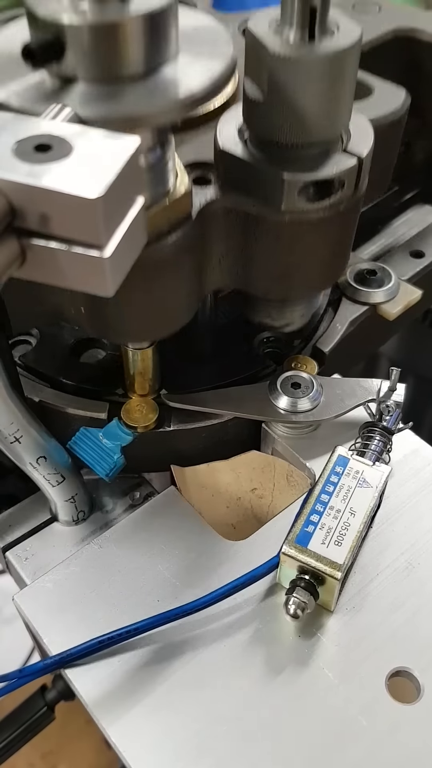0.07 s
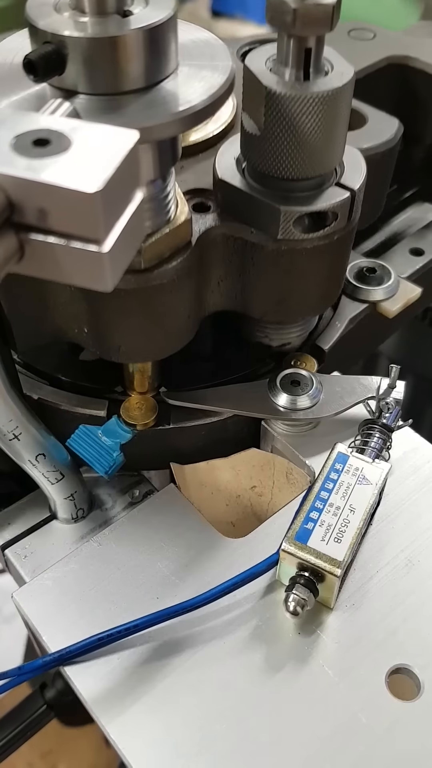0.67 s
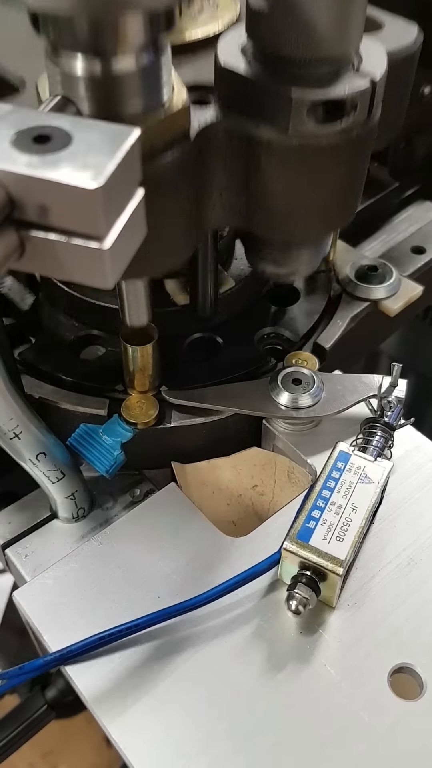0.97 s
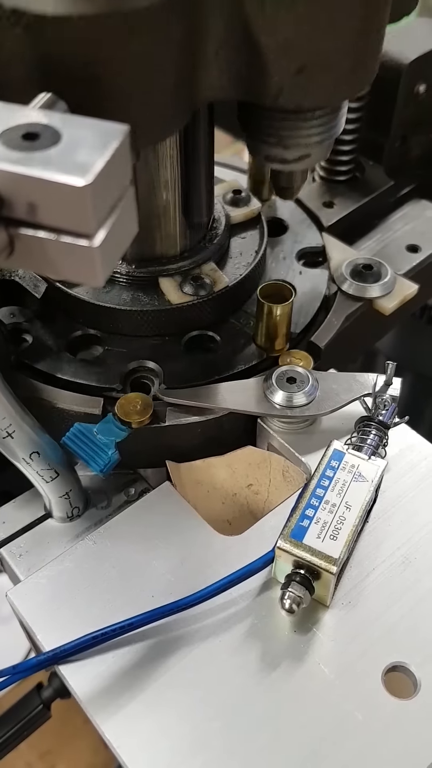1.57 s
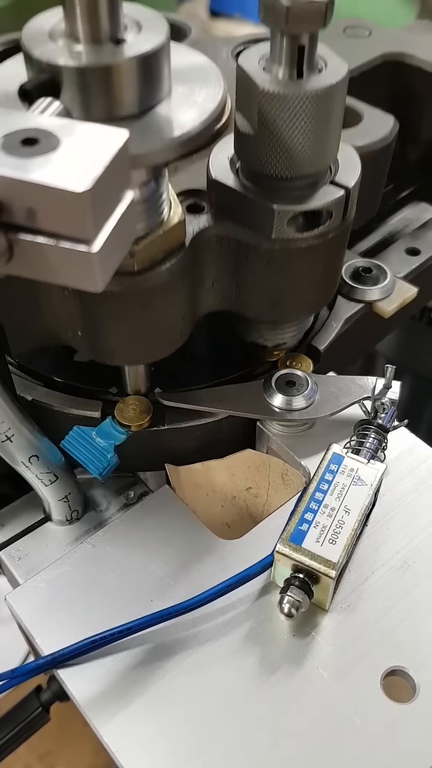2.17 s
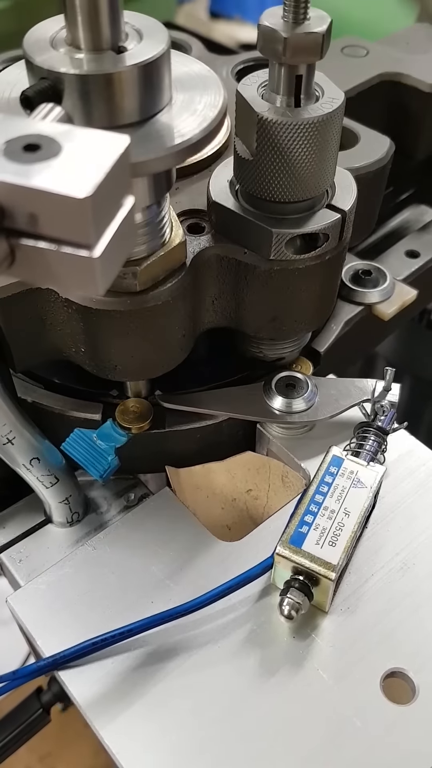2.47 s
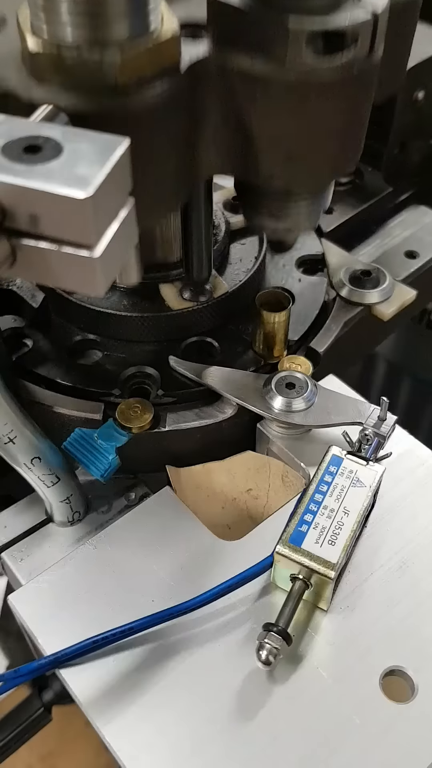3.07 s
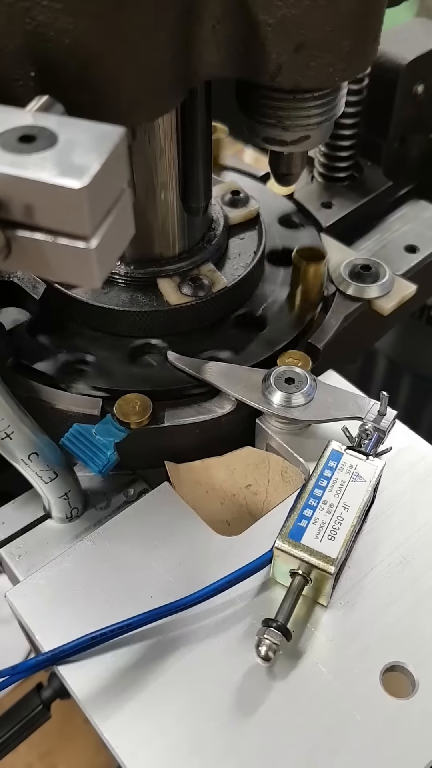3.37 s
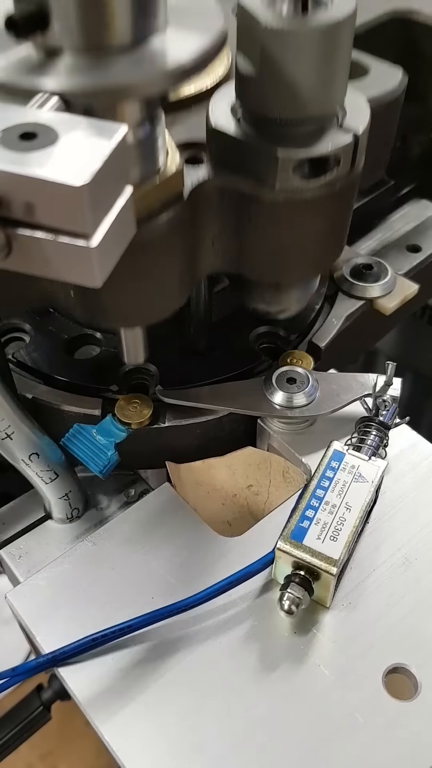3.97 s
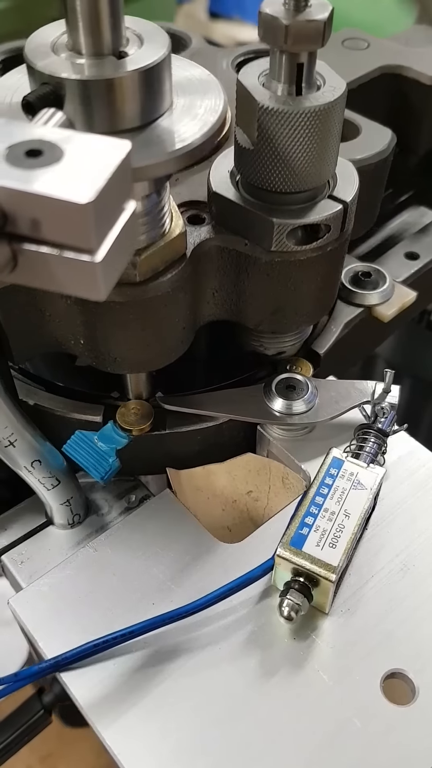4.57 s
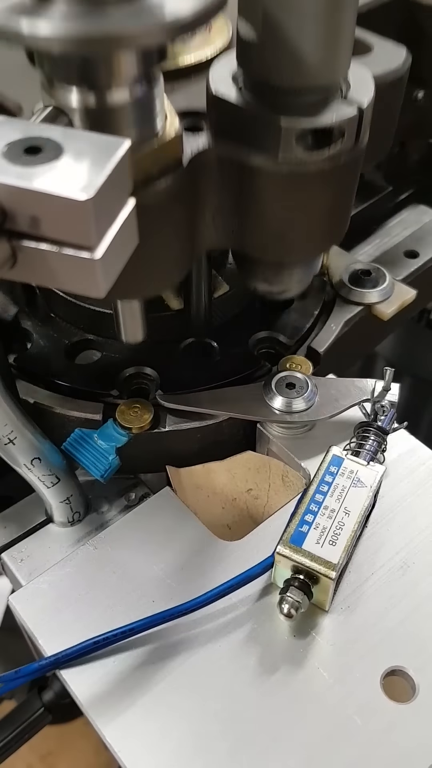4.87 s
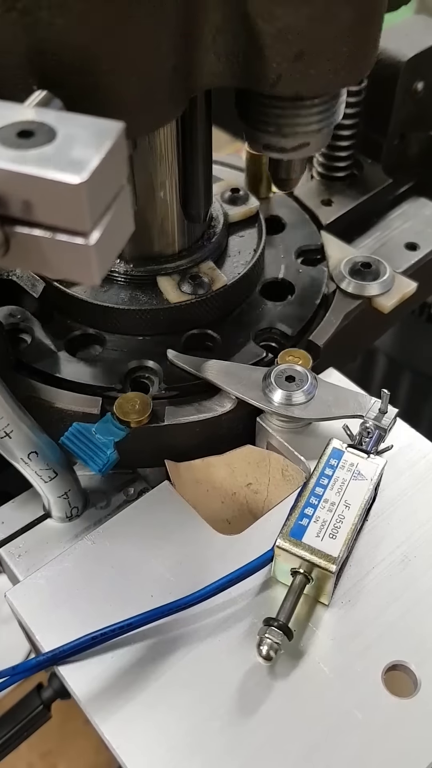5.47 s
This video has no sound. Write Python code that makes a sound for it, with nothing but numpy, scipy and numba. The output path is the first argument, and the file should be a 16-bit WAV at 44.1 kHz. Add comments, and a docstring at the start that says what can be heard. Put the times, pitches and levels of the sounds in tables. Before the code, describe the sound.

A motorised press runs in a workshop, close to a hand-held phone, with a steady motor hum, gear noise and a thin high whine. It opens with a few dull knocks and a brief metallic jingle. About every two seconds a stroke brings sharp clicks, ticks and the bright clink of brass cases. In the second half a steel lever snaps loudly twice, and everything briefly dips in level after each snap.

```python
"""Motorised reloading press

A press cycles about every two seconds, close to a hand-held phone in a workshop. Its motor hums and
its drive whines. Impacts excite damped modes: dull knocks sound, a loose part jingles, and pins, pawls
and brass cases click and ring. Twice a solenoid snaps a steel lever, and each snap makes the phone's
gain control duck for about half a second."""
import sys
import numpy as np
from scipy import signal
from scipy.fft import rfft, irfft
from scipy.io import wavfile
from scipy.ndimage import uniform_filter1d
from numba import njit

SR = 44100
rng = np.random.default_rng(int(sys.argv[2]) if len(sys.argv) > 2 else 0)


def dump(signal):
    """Clip the signal to [-1, 1] and save it as 16-bit WAV at the path in sys.argv[1]."""
    limited = np.clip(np.atleast_2d(signal).T, -1, 1)
    pcm = np.round(limited * 32767).astype(np.int16)
    wavfile.write(sys.argv[1], SR, pcm)


N = 252252
T = np.arange(N) / SR
AGE = T[:SR // 2]  # time since an impact, t/s
FREQ = np.arange(N // 2 + 1) * SR / N


def undb(db):
    """Amplitude ratio of a level in decibels."""
    return 10 ** (np.asarray(db) / 20)


def pan(db):
    """Level difference, left minus right, as gains at the two microphone ports."""
    return undb(np.array([[db], [-db]]) / 2)


def add(out, t, x):
    """Superposition: x joins out from time t."""
    i = min(int(t * SR), N)
    out[:, i:i + x.shape[1]] += x[:, :N - i]


def walk(rate_hz):
    """Smooth random fluctuation with a spread near 1."""
    k = int(SR / rate_hz)
    steps = np.repeat(rng.standard_normal(N // k + 1), k)
    return 1.3 * uniform_filter1d(uniform_filter1d(steps, k), k)[:N]


def rise(start_db, end_db, from_s, length_s):
    """Linear ramp between two steady levels."""
    return start_db + (end_db - start_db) * np.clip((T - from_s) / length_s, 0, 1)


def fade(t60):
    """Damping: exponential decay by 60 dB in t60 seconds."""
    return np.exp(-np.log(1000) * AGE / t60)


def noise(spectrum, size, lag_s, diffuse):
    """Partial coherence: direct noise reaches the right port late, amid a diffuse field; rms 1."""
    f = np.arange(size // 2 + 1) * SR / size
    hz, db = np.transpose(spectrum)
    colour = undb(np.interp(np.log(f + 1), np.log(hz), db))
    source, left, right = rfft(rng.standard_normal((3, size))) * colour
    direct = np.array([source, source * np.exp(-2j * np.pi * f * lag_s)])
    x = irfft(np.sqrt(1 - diffuse) * direct + np.sqrt(diffuse) * np.array([left, right]), size)
    return x / x.std()


def ring(hz, t60, rise_s, spread, count=4):
    """Mode splitting: close partners beat as they decay, each with its own phase at each port."""
    detune = spread * np.linspace(-1, 1, count) * rng.uniform(.5, 1, count)
    phase = rng.random((count, 2, 1))
    partners = sum(np.sin(2 * np.pi * (hz * (1 + d) * AGE + p)) for d, p in zip(detune, phase))
    return partners * np.sqrt(2 / count) * fade(t60) * (1 - np.exp(-AGE / rise_s))


def reflect(x, db, t60):
    """Reverberation: dense reflections from nearby metal and walls follow the direct sound."""
    tail = rng.standard_normal((2, len(AGE))) * fade(t60) * (AGE > .002)
    tail /= np.sqrt(np.sum(tail ** 2, axis=1, keepdims=True))
    return x + undb(db) * signal.fftconvolve(x, tail, axes=1)[:, :N]


# resonances of the press frame: f/Hz, width/Hz, lift at full depth/dB
FRAME_MODES = [(763, 9.6, 7.5), (1170, 150, 1), (1800, 244, 4.5), (2150, 186, -5), (2566, 550, 4.5),
               (4030, 690, 3.5), (5430, 80, 6), (6940, 360, 7.5)]


def frame(x, depth=1):
    """Resonance: the press frame colours a sound as a minimum-phase filter."""
    lift_db = sum(db / (1 + (2 * (FREQ - hz) / width) ** 2) for hz, width, db in FRAME_MODES)
    # folding the cepstrum makes the frame ring only after it is struck
    cepstrum = irfft(np.log(undb(depth * lift_db)), N)
    cepstrum[1:N // 2] *= 2
    cepstrum[N // 2 + 1:] = 0
    return irfft(rfft(x) * np.exp(rfft(cepstrum)), N)


# spectra of the gear noise and of the faint hiss above it: f/Hz, relative level/dB
GEAR_SPECTRUM = [(20, -37.5), (32, -17), (90, -5.5), (155, -4.5), (255, -1), (400, -5.5), (500, -8),
                 (660, -1), (850, -9), (1050, -15), (1500, -17.5), (2150, -15), (3000, -17.5),
                 (4000, -29.5), (5600, -32.5), (6200, -39), (7700, -45), (9000, -73)]
HISS_SPECTRUM = [(7000, -0.5), (8200, 5), (8800, -52), (9600, -22.5), (10700, -9), (12300, 2.5),
                 (13500, -4.5), (15500, -17), (16500, -33.5)]
# balance of the gear noise between the ports: f/Hz, left minus right level/dB
GEAR_BALANCE = [(70, 2), (200, -1.5), (380, 0.5), (650, -4), (1150, 4), (2300, -0.8), (7000, -21)]
# motor tones: f/Hz, level/dB
HUM_TONES = [(74, -51), (162, -49), (222.5, -53), (445.5, -45), (891, -47)]


def motor(gear_db=-33.5, hiss_db=-45, flutter_db=1, waver=.0027, lag_s=.000583, tone_lag_s=.00042):
    """Forced vibration: gear and fan noise passes through the frame, beside wavering motor tones."""
    balance_db = np.interp(FREQ, *np.transpose(GEAR_BALANCE)) * np.array([[.5], [-.5]])
    gears = irfft(rfft(noise(GEAR_SPECTRUM, N, lag_s, diffuse=.34)) * undb(balance_db), N)
    out = undb(gear_db + flutter_db * walk(13)) * frame(gears)
    shaft_time = T + np.cumsum(waver * walk(12)) / SR
    port_times = np.array([shaft_time, shaft_time - tone_lag_s])
    for hz, db in HUM_TONES:
        out += np.sqrt(2) * undb(db + 1.7 * walk(6.9)) * np.sin(2 * np.pi * hz * port_times)
    bass = signal.sosfiltfilt(signal.butter(2, 280, fs=SR, output="sos"), out)
    bass_gain = undb(rise(-18, -2.5, from_s=.55, length_s=.5))  # the bass starts low and comes up
    hiss = undb(hiss_db) * noise(HISS_SPECTRUM, N, lag_s, diffuse=1) * pan(7.3)
    return out + bass * (bass_gain - 1) + hiss


# switching tone and its sidebands: offset in multiples of the ripple, relative level/dB
WHINE_PARTIALS = [(-1, -62), (0, -43.5), (1, -51), (2, -53), (3, -53)]


def drive(switching_hz=7926.4, ripple_hz=150, waver_db=2.5):
    """Modulation: mains ripple gives the drive's whine sidebands; standing waves favour the right port."""
    port_phase = np.array([[0], [1.52]])
    tone = sum(undb(db) * np.cos(2 * np.pi * (switching_hz + round(k) * ripple_hz) * T + port_phase)
               for k, db in WHINE_PARTIALS)
    level_db = rise(-3.5, -1, from_s=0, length_s=.99) + waver_db * np.array([walk(5.95), walk(5.52)])
    return np.sqrt(2) * tone * undb(level_db) * pan(-11)


# dull knocks close to the phone: t/s, relative level/dB, f/Hz
KNOCK_HITS = [(.032, -18, 732), (.036, -28, 120), (.184, -8, 783), (0.238, -20, 1007), (.264, -13, 469),
              (.327, -24, 696), (.432, -17.5, 857), (.472, -16.5, 638), (.524, -26, 800), (2.626, -24, 332),
              (2.679, -21, 184), (2.730, -17.5, 177), (2.83, -20, 164), (2.839, -18.5, 433)]


def knocks(bounce_s=.018, bounce_db=-8, rise_s=.0014, soft_db=-18.5):
    """Damped resonance in a thud, with one bounce: lower knocks ring longer, harder ones are brighter."""
    out = np.zeros((2, N))
    for t, db, hz in KNOCK_HITS:
        envelope = fade(t60=.048 * (700 / hz) ** .6) * (1 - np.exp(-AGE / rise_s))
        tone = np.sqrt(2) * np.sin(2 * np.pi * hz * AGE)
        for delay, blow_db in [(0, db), (bounce_s, db + bounce_db)]:
            bright_db = max(blow_db - soft_db, 0)
            spectrum = [(hz / 5, -30), (hz / 2, -7), (hz, 0), (hz * 1.64, -3),
                        (hz * 3, -21 + bright_db), (hz * 10, -50 + bright_db)]
            thud = noise(spectrum, len(AGE), lag_s=0, diffuse=.17)
            add(out, t + delay, undb(blow_db - 3) * (thud + tone) * envelope * pan(-2.5))
    return signal.sosfilt(signal.butter(3, 120, "highpass", fs=SR, output="sos"), out)


# spectra of a metallic click, body and bright edge, as the phone's microphone colours them:
# f/Hz, relative level/dB
BODY_SPECTRUM = [(300, -3.5), (900, -7.5), (2400, 2.5), (3800, -0.5), (5200, 1), (6200, 5), (7400, 1),
                 (8200, 4.5), (9000, -21.5), (12000, -38)]
EDGE_SPECTRUM = [(8000, -23), (9300, -19.5), (10400, -2.5), (11300, 2), (12500, 8), (13500, 3), (15200, -9),
                 (16500, -32.5)]


def contact(body_db, edge_db, lag_s=.000408):
    """Impact noise: a brief, broadband metallic click, coloured by the microphone."""
    body = undb(body_db) * noise(BODY_SPECTRUM, len(AGE), lag_s, diffuse=.44) * fade(t60=.031)
    edge = undb(edge_db) * noise(EDGE_SPECTRUM, len(AGE), lag_s, diffuse=.39) * fade(t60=.021)
    return body * pan(.94) + edge * pan(6.3)


def chime(db, hz, t60, pan_db=8):
    """Free vibration of a small struck part."""
    return undb(db) * ring(hz, t60, rise_s=.00045, spread=.00744) * pan(pan_db)


def click(body_db, edge_db, rebound_s=.006, rebound_db=-4.5):
    """Inelastic collision: a contact and one weaker rebound."""
    out = contact(body_db, edge_db)
    late = int(rebound_s * rng.uniform(.7, 1.3) * SR) + 1
    out[:, late:] += contact(body_db + rebound_db, edge_db + rebound_db)[:, :-late]
    return out


# strokes of the press: t/s, pin level/dB, pin f/Hz, pawl level/dB
PRESS_STROKES = [(.146, -13.5, 12970, -13), (2.112, -11.5, 13000, -11.5), (4.084, -11.5, 12650, -12)]
# ticks of slides and links: t/s into the stroke, body level/dB, edge level/dB
LINK_TICKS = [(0.255, -34, -38), (1.233, -32.5, -31), (1.356, -30, -28.5), (1.631, -27.5, -25),
              (1.909, -37, -39)]


def strokes(clack_s=.1455, pawl_s=1.529):
    """Cyclic impacts: a pin rings, the ram bottoms out, links tick, the pawl drops into the shell plate."""
    out = np.zeros((2, N))
    for t, pin_db, pin_hz, pawl_db in PRESS_STROKES:
        pin = contact(pin_db - 11.5, pin_db) + chime(pin_db, pin_hz, t60=.065)
        ram_clack = contact(-26.5, -39) + chime(-27, hz=1848, t60=.039, pan_db=3)
        pawl = click(pawl_db - 4.5, pawl_db) + chime(pawl_db - 10, hz=15000, t60=.03)
        shaken_cases = chime(pawl_db - 15, hz=10930, t60=.17)
        add(out, t, pin)
        add(out, t + clack_s, ram_clack)
        add(out, t + pawl_s, pawl + shaken_cases)
        for delay, body_db, edge_db in LINK_TICKS:
            add(out, t + delay, click(body_db, edge_db))
    return out


# modes of a small loose metal part: f/Hz, relative level/dB, t60/s
JINGLE_MODES = [(10900, -11, .25), (11243, -8, .2), (11358, 0, .2), (12220, -14, .1)]


def jingle(start_s=.181, gap_s=.049, blow_db=-11, bounce_db=-19.5, loss_db=2, bounces=6):
    """Repeated excitation: a loose part is struck, then rings again at each weaker, uneven bounce."""
    out, t = np.zeros((2, N)), start_s
    for db in [blow_db] + [bounce_db - k * loss_db for k in range(bounces)]:
        modes = sum(undb(mode_db) * ring(hz, t60, rise_s=.00074, spread=0, count=1)
                    for hz, mode_db, t60 in JINGLE_MODES)
        add(out, t, undb(db) * modes)
        t += gap_s * (1 + .08 * rng.standard_normal())
    return out


# further dry clicks of the press: t/s, body level/dB, edge level/dB
PRESS_CLICKS = [(.183, -22, -34), (.312, -33.5, -29), (1.877, -23, -28), (2.914, -29, -36),
                (3.822, -20, -15), (4.881, -29, -36), (5.196, -32, -34)]


def press_clicks(ticks=14, tick_db=-38, scatter_db=.5):
    """Impact noise: dry clicks, several recurring from stroke to stroke, among faint random ticks."""
    out = np.zeros((2, N))
    for t, body_db, edge_db in PRESS_CLICKS:
        add(out, t, click(body_db, edge_db))
    for _ in range(ticks):
        db = tick_db + scatter_db * rng.standard_normal()
        add(out, rng.random() * N / SR, contact(db, db))
    return out


# clinks of brass cases: t/s, edge level/dB, f/Hz, t60/s
CASE_CLINKS = [(.932, -15, 11450, 0.05), (1.626, -18, 10800, 0.075), (1.887, -24, 10850, 0.07),
               (2.821, -13.5, 11430, 0.057), (3.606, -12, 10880, 0.1), (3.865, -26.5, 11060, 0.086),
               (4.767, -19.5, 11200, 0.049), (5.556, -20.5, 10850, .3), (5.659, -21, 11000, 0.21)]


def brass_cases():
    """Shell vibration: cases clink as they leave the die or rock in the plate."""
    out = np.zeros((2, N))
    for t, db, hz, t60 in CASE_CLINKS:
        add(out, t, contact(db - 9.5, db) + chime(db - 4.5, hz, t60))
    return out


# blows of the solenoid's lever on its stop: t/s, relative level/dB
SOLENOID_SNAPS = [(3.1105, 4), (5.1103, 4)]


def plunger(lead_s=.0148):
    """Contact noise: the plunger clicks as it starts to move, just ahead of each blow."""
    out = np.zeros((2, N))
    for t, _ in SOLENOID_SNAPS:
        add(out, t - lead_s, contact(body_db=-27, edge_db=-24))
    return out


# a blow and its bounces: t/s after the blow, relative level/dB
SNAP_BOUNCES = [(0, 2), (.0019, -1), (0.013, -17)]
# spectra of the blow and of the spring's rattle: f/Hz, relative level/dB
BLOW_SPECTRUM = [(35, -14), (110, 3), (220, 9.5), (500, 8), (950, 4.5), (1500, -4), (3000, 0.5),
                 (7500, -2.5), (9200, -17), (12000, 2.5), (14000, -8), (16500, -8)]
RATTLE_SPECTRUM = [(40, -16), (110, -11), (200, -13), (600, -33), (1200, -17), (3000, -1.5), (5200, 7),
                   (6200, 9.5), (7500, 8), (8900, -39), (10300, 7.5), (12200, 3), (14000, 3), (15500, -27)]
# modes of lever and plunger: f/Hz, relative level/dB, t60/s
LEVER_MODES = [(84, -34.5, 0.094), (169, -33, 0.16), (268, -33.5, 0.12), (960, -37, .025), (5110, -44, .08),
               (7500, -36, 0.35), (12070, -16.5, 0.14), (13700, -16, 0.036)]


def solenoid(blow_db=-9, rattle_db=-25, chatter_db=3):
    """Impulsive excitation: the lever hits its stop and bounces; lever and return spring chatter on."""
    out = np.zeros((2, N))
    for t, db in SOLENOID_SNAPS:
        for delay, bounce_db in SNAP_BOUNCES:
            blow = noise(BLOW_SPECTRUM, len(AGE), lag_s=.00025, diffuse=.71) * fade(t60=.0073)
            add(out, t + delay, undb(db + blow_db + bounce_db) * blow * pan(8.6))
        rattle = noise(RATTLE_SPECTRUM, len(AGE), lag_s=.0003, diffuse=1) * fade(t60=.24)
        lever = sum(undb(mode_db) * ring(hz, t60, rise_s=.0083, spread=.0081)
                    for hz, mode_db, t60 in LEVER_MODES)
        chatter = undb(chatter_db * walk(282)[:len(AGE)])
        add(out, t, undb(db) * chatter * (undb(rattle_db) * rattle * pan(.77) + lever * pan(10.4)))
    return reflect(frame(out, depth=.34), db=-27, t60=.15)


def scene():
    """Superposition at the two ports; the press's small impacts share its frame and reflections."""
    running = motor() + drive()
    impacts = strokes() + brass_cases() + press_clicks() + plunger()
    press = reflect(frame(impacts, depth=.84), db=-7.5, t60=.18)
    return running + press + knocks() + jingle() + solenoid()


@njit
def duck(sense_db, threshold_db, duck_db, start_db, hold_s, attack_s, release_s):
    """Feedback: the gain in dB falls when level plus gain passes the threshold, holds, then recovers."""
    out, gain_db, wait = np.empty(len(sense_db)), start_db, 0.
    for i in range(len(out)):
        wait = hold_s * SR if sense_db[i] + gain_db > threshold_db else wait - 1
        target_db, time_s = (duck_db, attack_s) if wait > 0 else (0., release_s)
        gain_db += (target_db - gain_db) / (time_s * SR)
        out[i] = gain_db
    return out


def gain_control(x):
    """Automatic gain control: it starts low, and ducks on a midrange overload at the left port."""
    mids = signal.sosfilt(signal.butter(2, [2000, 7000], "bandpass", fs=SR, output="sos"), x[0])
    sense_db = 10 * np.log10(np.abs(uniform_filter1d(mids ** 2, size=132)) + 1e-12)
    gain_db = duck(sense_db, threshold_db=-17., duck_db=-13., start_db=-7.5,
                   hold_s=.58, attack_s=.11, release_s=.14)
    return x * undb(gain_db)


def record(dry):
    """Limited range and bandwidth: the phone rides its gain, clips at full scale and cuts above 16 kHz."""
    clipped = np.clip(gain_control(dry), -1, 1)
    return signal.sosfilt(signal.ellip(8, .2, 70, 16000, fs=SR, output="sos"), clipped)


dry = scene()
out = record(dry)
dump(out)
```